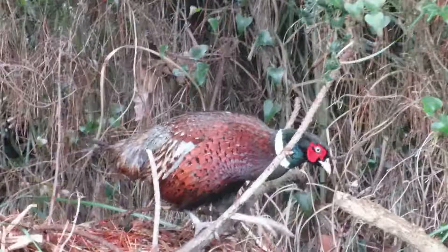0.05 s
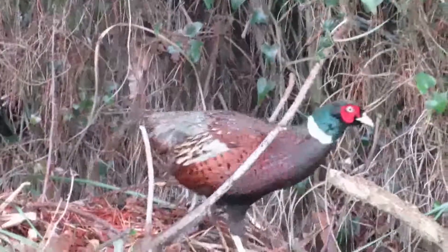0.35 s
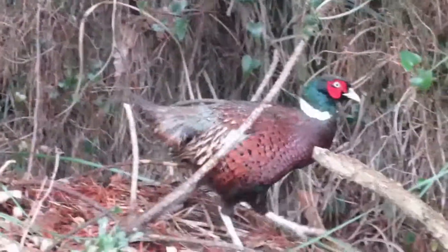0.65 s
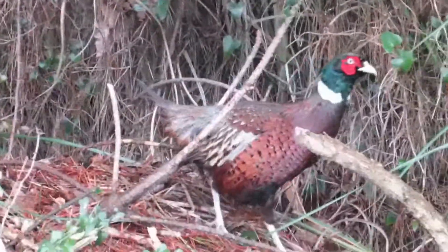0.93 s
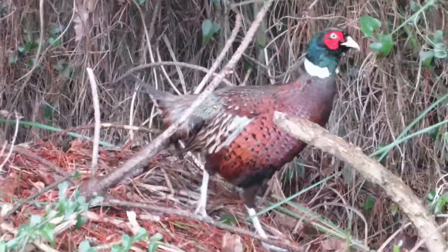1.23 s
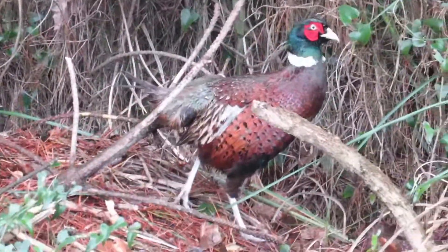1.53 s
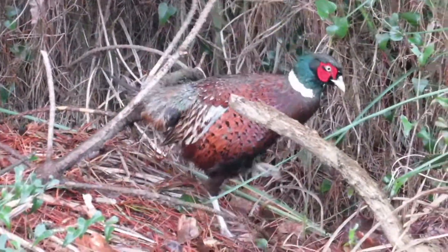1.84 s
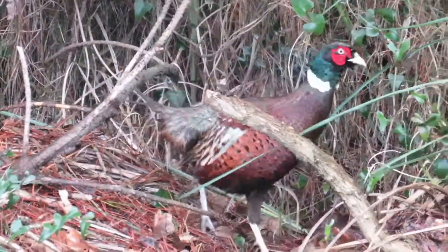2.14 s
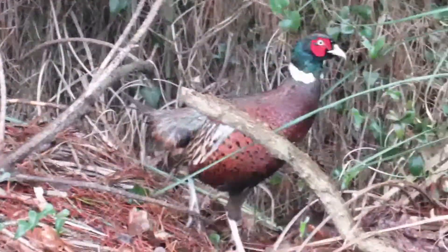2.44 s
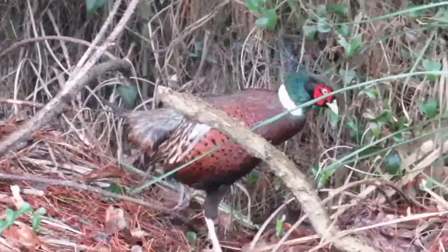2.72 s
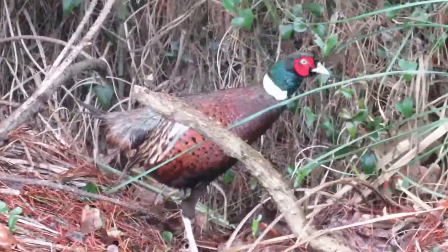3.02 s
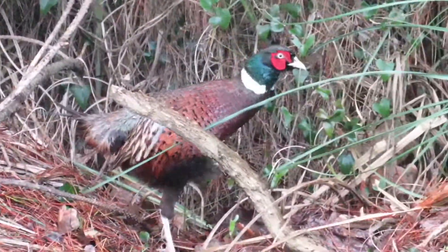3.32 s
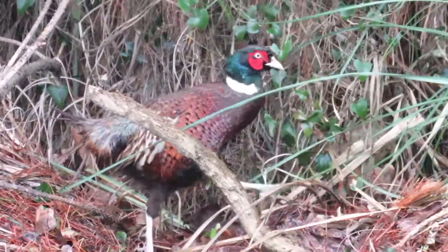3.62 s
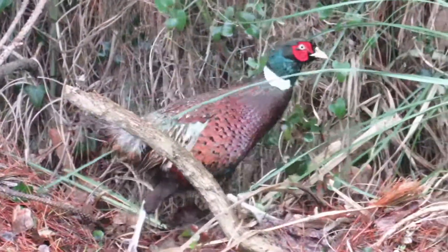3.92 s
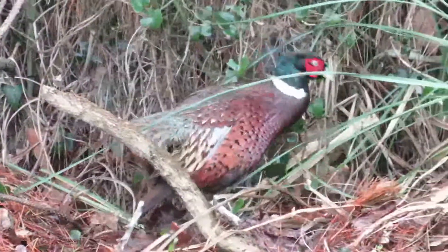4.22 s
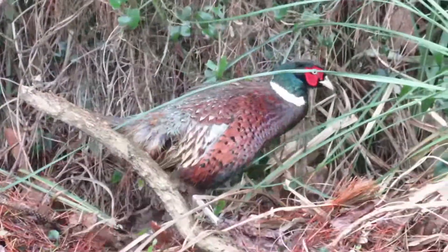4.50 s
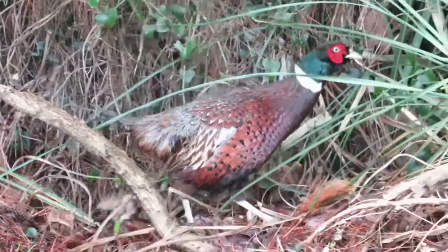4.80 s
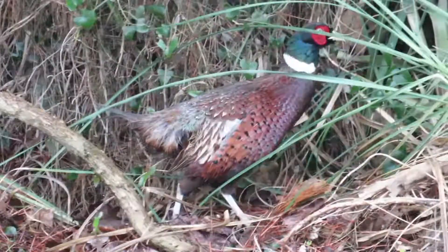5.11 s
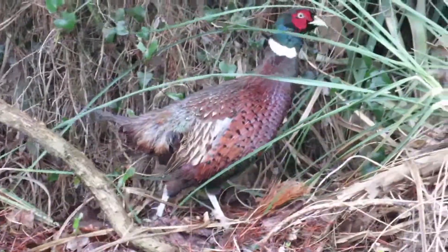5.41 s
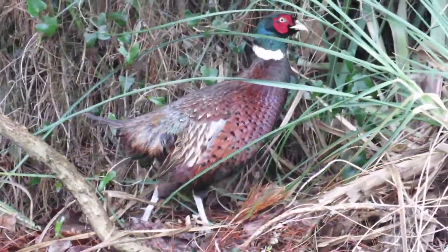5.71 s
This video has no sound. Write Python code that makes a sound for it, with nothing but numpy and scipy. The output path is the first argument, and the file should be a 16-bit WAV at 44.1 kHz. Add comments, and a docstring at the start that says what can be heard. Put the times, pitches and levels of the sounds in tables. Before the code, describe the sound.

A steady low rumble of distant traffic and wind runs for about six seconds, with a light hiss and faint ticks of dry leaves. A stick knocks once at 0.2 seconds. From 0.6 seconds gusts buffet the microphone with soft low thumps, the strongest at 1.3 seconds, returning more weakly around 2.1 and 2.9 seconds. Small birds off to the left give thin, high whistles and short chirps throughout, lightly scattered by the thicket, while a faint pip repeats about three times a second. Twigs crackle quietly under a walking pheasant around 1.9 and 2.1 seconds, and again near 4.8 and 5.2. Two quick chirps come at about 3.3 and 3.5 seconds, and a clearer falling, warbling note at 4.3. One dry click sounds just after 5 seconds, followed by a few last chirps.

```python
"""First comes a steady rumble of far traffic and wind over dry brush, and a stick knocks once.
Gusts then buffet the microphone, their swirls of air landing as soft thumps. Small birds whistle
and chirp in gliding tones that the thicket scatters, and a faint pip repeats. Twigs snap in
bursts of crackle under a walking pheasant, and one dry click sounds near the end."""
import sys
import numpy as np
from scipy import signal
from scipy.fft import rfft, irfft
from scipy.io import wavfile

SR = 44100
rng = np.random.default_rng(int(sys.argv[2]) if len(sys.argv) > 2 else 0)


def bounce(signal):
    """Save signal as a 16-bit WAV file at the path given by the first command-line argument."""
    frames = np.transpose(np.atleast_2d(signal))
    limited = np.clip(frames, -1, 1)
    pcm = np.round(limited * 32767).astype(np.int16)
    wavfile.write(sys.argv[1], SR, pcm)


N = 262395
T = np.arange(N) / SR

# how alike the left and right sides are: (frequency [Hz], likeness [1 = the same, 0 = unrelated])
STEREO_LIKENESS = [(60, 1), (200, 1), (500, 0.99), (1170, 0.92), (1790, 0.82), (2740, 0.23), (4200, 0.049),
                   (6400, 0.059), (14000, -0.26)]
# tone colour of dry plants cracking: (frequency [Hz], relative level [dB])
CRACK_SPECTRUM = [(1000, -9), (3500, 10), (7000, 1), (11000, -2.5), (15500, -14)]


def from_db(db):
    """Turn decibels into a number to multiply by."""
    return 10 ** (np.asarray(db) / 20)


def rms_one(x):
    """Scale a signal so its average strength (rms) is 1."""
    return x / np.sqrt(np.mean(x ** 2) + 1e-20)


def in_time(rows):
    """Join rows of (time, values...) with straight lines, one curve for each value."""
    times, *columns = np.transpose(rows)
    return [np.interp(T, times, column) for column in columns]


def at_hz(points, hz):
    """Read between rows of (frequency, value), giving every octave equal room."""
    frequencies, values = np.transpose(points)
    return np.interp(np.log(hz), np.log(frequencies), values)


def drift(rate_hz):
    """A smooth random wobble of typical size 1; a higher rate wobbles faster."""
    step, warm_up = 40, 2000  # one random value every 40 samples
    pole = np.exp(-2 * np.pi * rate_hz * step / SR)
    draws = rng.standard_normal(N // step + warm_up + 2)
    smooth = signal.lfilter([1], [1, -2 * pole, pole * pole], draws)[warm_up:]
    return np.interp(np.arange(N) / step, np.arange(len(smooth)), rms_one(smooth))


def noise(spectrum, likeness=STEREO_LIKENESS):
    """Stereo noise of strength 1 with a given tone colour, fading steeply outside its range."""
    hz = np.maximum(np.arange(N // 2 + 1) * SR / N, 1)
    edges = np.minimum(1, np.minimum(hz / spectrum[0][0], spectrum[-1][0] / hz)) ** 6
    mid, side = rfft(rng.standard_normal((2, N))) * from_db(at_hz(spectrum, hz)) * edges
    alike = np.clip(at_hz(likeness, hz), -.999, .999)
    return rms_one(irfft(np.sqrt(1 + alike) * mid + np.sqrt(1 - alike) * side * [[1], [-1]], N))


def tone(hz):
    """A pure tone of strength 1 that follows a pitch curve."""
    return np.sqrt(2) * np.sin(2 * np.pi * np.cumsum(hz) / SR)


def gate(start, end, edge_s):
    """Fade in at the start, hold, and fade out by the end."""
    return np.clip(np.minimum(T - start, end - T) / edge_s, 0, 1)


def swell(start, length_s, rise_share):
    """Rise smoothly for a share of the length, then fall smoothly."""
    crest = start + length_s * rise_share
    return np.sin(np.pi / 2 * np.interp(T, [start, crest, start + length_s], [0, 1, 0]))


def from_left(x, lag_s=.00004):
    """Sound from the left reaches the right side a little later."""
    return np.array([x, np.interp(T - lag_s, T, x)])


def air(rumble_gain_db, hiss_gain_db, waver_db):
    """Far traffic and wind waver slightly, with a growing engine drone below and a hiss above."""
    # tone colour of each layer: (frequency [Hz], relative level [dB])
    rumble_spectrum = [(22, -27), (64, -12), (104, -9.5), (170, -3.5), (230, -4), (350, -4), (450, -1),
                       (560, 1.57), (740, -6), (945, -8.5), (1150, -9.5), (2000, -20), (2800, -31)]
    drone_spectrum = [(120, -9), (175, -1), (235, -4.5)]
    hiss_spectrum = [(2200, -6), (2750, -3.5), (3100, -3.5), (4300, -5), (6560, -11), (10000, -17),
                     (13000, -22), (15000, -32)]
    # loudness before the gains are added: (time [s], rumble [dB], hiss [dB])
    air_levels = [(0.3, -38, -75), (0.56, -39.5, -75), (1.26, -39, -78), (2.9, -39, -78.5),
                  (3.6, -38.5, -78.5), (4.5, -39.5, -78), (5.66, -39.5, -78.5), (5.8, -41, -77.5)]
    # loudness of the far engines: (time [s], level [dB])
    drone_levels = [(.3, -69), (2.5, -56), (4.2, -50), (5.8, -50)]
    rumble_db, hiss_db = in_time(air_levels)
    rumble = from_db(rumble_db + rumble_gain_db + waver_db * drift(8.7)) * noise(rumble_spectrum)
    drone = from_db(in_time(drone_levels)[0]) * noise(drone_spectrum)
    hiss = from_db(hiss_db + hiss_gain_db) * noise(hiss_spectrum)
    return rumble + drone + hiss


def settling_leaves(level_db, ticks_per_s, decay_s):
    """Dry leaves and needles tick faintly as they settle."""
    ticks = (rng.random(N) < ticks_per_s / SR) * rng.uniform(0.43, 1, N)
    fading = signal.lfilter([1], [1, -np.exp(-1 / (decay_s * SR))], ticks + 1e-18)
    return from_db(level_db) * fading * noise(CRACK_SPECTRUM)


def hidden_birds(level_db, low_hz, high_hz, length_s, count):
    """Birds deep in the brush sing short, faint glides at random times."""
    pitch, level = np.full(N, float(low_hz)), np.zeros(N)
    for when, height, slope, softness in rng.random((count, 4)):
        progress = (T - when * T[-1]) / length_s
        on = (progress > 0) & (progress < 1)
        glide_octaves = (slope - .5) * progress[on] * .5
        pitch[on] = low_hz * (high_hz / low_hz) ** height * 2 ** glide_octaves
        level[on] = from_db(level_db - 6 * softness) * np.sin(np.pi * progress[on])
    return level * tone(pitch)


def pips(gain_db, upper_hz, upper_db, tail_db):
    """Tiny bursts of tone with a weak tail, each followed at once by a faint higher note."""
    # the pips, mostly three a second: (time [s], relative level [dB])
    pip_events = [(.188, -48), (.298, -57), (.403, -53), (.52, -50.5), (.795, -56), (.867, -47),
                  (.977, -49.5), (1.192, -51.5), (1.535, -50.5), (1.867, -50.5), (2.202, -50.5),
                  (2.538, -52.5), (2.87, -52.5), (3.206, -55), (3.538, -50.5), (3.874, -51.5),
                  (4.209, -50.5), (4.547, -52.5), (4.882, -48), (5.207, -51.5), (5.563, -49.5),
                  (5.79, -51.5), (5.875, -51.5)]
    width_s, tail_s, upper_delay_s = .0033, .012, .0035
    pitch_hz, rise_hz_per_s = 3075, 6.6
    level, waver = np.zeros(N), drift(169)
    for time, db in pip_events:
        near = np.abs(T - time) < .05
        age = T[near] - time
        burst = np.exp(-(age / width_s) ** 2)
        tail = (age > 0) * from_db(tail_db) * np.exp(-np.abs(age) / tail_s)
        level[near] += from_db(db + gain_db) * np.maximum(burst, tail)
    upper = from_db(upper_db) * np.interp(T - upper_delay_s, T, level) * tone(upper_hz + 200 * waver)
    return level * tone(pitch_hz + rise_hz_per_s * T + 50 * waver) + upper


def twig_snaps(grain_db):
    """Twigs break underfoot in fading bursts of crackle; the thinner the twig, the higher it sounds."""
    # breaking twigs: (time [s], relative level [dB], time to fade by 60 dB [s], low cut [Hz])
    snaps = [(1.852, -52.5, .16, 1200), (2.122, -58, .12, 1500), (4.798, -51.5, 0.36, 8500),
             (5.228, -52, .045, 7000)]
    crackle = rms_one(from_db(grain_db * drift(400))) * noise(CRACK_SPECTRUM)
    out = np.zeros((2, N))
    for start, db, fade_s, low_hz in snaps:
        level = (T >= start) * from_db(db - 60 * np.clip((T - start) / fade_s, 0, 3))
        out += level * signal.sosfilt(signal.butter(2, low_hz, "high", fs=SR, output="sos"), crackle)
    return out


def stick_knock(high_cut_hz):
    """One soft knock makes a stick ring briefly at several pitches."""
    # the knock: (time [s], strength of the hit [dB])
    knocks = [(0.2198, -28.5)]
    # how the wood rings: (pitch [Hz], relative level [dB], time to fade by 60 dB [s])
    wood_tones = [(1185, 2, 0.028), (1560, 1, 0.015), (1790, 1, 0.032), (1930, 0.5, .015),
                  (3800, -8.5, 0.016), (4830, -18, 0.015)]
    hits, out = np.zeros(N), np.zeros(N)
    for time, db in knocks:
        hits[round(time * SR)] = from_db(db)
    for k, (hz, db, fade_s) in enumerate(wood_tones):
        decay, angle = from_db(-60 / (fade_s * SR)), 2 * np.pi * hz / SR  # both per sample
        ring = signal.lfilter([0, np.sin(angle)], [1, -2 * decay * np.cos(angle), decay ** 2],
                              hits + 1e-18)
        out += (-1) ** k * from_db(db) * ring
    return signal.sosfilt(signal.butter(3, high_cut_hz, fs=SR, output="sos"), out)


def dry_click(time_s, peak_db, decay_s):
    """The air pressure jumps and falls back at once."""
    return (T >= time_s) * from_db(peak_db) * np.exp(-np.abs(T - time_s) / decay_s)


def thicket(x, gain_db, fade_s, build_s):
    """Countless stems scatter sound into a soft tail, different on each side."""
    age = T[:SR]
    tail = rng.standard_normal((2, SR)) * from_db(-60 * age / fade_s) * np.minimum(age / build_s, 1)
    tail = tail / np.sqrt(np.sum(tail ** 2) / 2)
    return from_db(gain_db) * signal.fftconvolve(x[None], tail, axes=1)[:, :N]


def whistles(gain_db, flutter_db, upper_db, unsteady_hz):
    """A far bird's thin, arching notes flutter through the leaves, with a faint second voice above."""
    # the notes: (time [s], length [s], pitch [Hz], relative level [dB], pitch swing [Hz],
    # time of the arch's top [s], arch rate [Hz], second voice [Hz], quiver depth [0-1])
    notes = [(.0, .11, 5660, -58, 80, .07, 8, 6500, .1),
             (1.059, .131, 5790, -51.3, 95, 1.135, 12.5, 6750, .1),
             (1.755, .07, 6790, -66, 70, 1.80, 8, 7400, .1),
             (1.885, .118, 5480, -61, 125, 1.951, 8, 6200, .15),
             (2.445, .155, 5790, -61.5, 35, 2.54, 7, 7150, .35),
             (2.992, .145, 5495, -56.7, 90, 3.062, 6.5, 6080, .05),
             (3.587, .138, 5750, -56.2, 55, 3.662, 8.5, 6750, .12),
             (5.014, .135, 5740, -58.8, 35, 5.05, 6, 6550, .4),
             (5.51, .22, 5500, -66.5, 45, 5.62, 4.5, 6200, .4)]
    droop_hz, droop_s = 60.5, 0.0259  # each note sags as it ends
    quivers_per_s, quiver_hz = 31, 50  # a quiver shakes loudness and pitch together
    pitch, upper_pitch, level = np.zeros((3, N))
    for start, length, hz, db, swing_hz, crest, arches_per_s, upper_hz, quiver_depth in notes:
        arch = swing_hz * np.cos(2 * np.pi * arches_per_s * (T - crest))
        droop = droop_hz * np.clip(1 + (T - start - length) / droop_s, 0, 1)
        quiver = quiver_depth * np.cos(2 * np.pi * quivers_per_s * (T - start))
        bend = arch - droop + quiver_hz * quiver
        pitch = np.where(T >= start, hz + bend, pitch)
        upper_pitch = np.where(T >= start, upper_hz + bend, upper_pitch)
        level += from_db(db + gain_db) * gate(start, start + length, edge_s=0.016) * (1 + quiver)
    voice = tone(pitch + unsteady_hz * drift(120))
    upper_voice = from_db(upper_db) * tone(upper_pitch + 70 * drift(60))
    return level * from_db(flutter_db * drift(45)) * (voice + upper_voice)


def chirps():
    """Nearer birds sing raspy glides. Returns the direct sound and the part that enters the thicket."""
    # the chirps: (time [s], length [s], first pitch [Hz], target pitch [Hz], glide time [s], level [dB],
    # rasp [Hz], second voice strength [0-1], share spent rising [0-1], part sent to the thicket [dB])
    calls = [(.272, .045, 3700, 2900, .03, -63, 60, 0, .5, -10),
             (.945, .05, 4000, 3200, .03, -64, 60, 0, .4, -10),
             (1.945, .065, 4300, 3300, .05, -67, 40, 0, .3, -6),
             (2.365, .065, 3800, 6000, .075, -61, 130, 0, .3, -6),
             (3.2893, .011, 4200, 7150, .0019, -48.3, 220, .45, .22, -3.5),
             (3.4787, .017, 4200, 7130, .0018, -49.2, 130, .42, .14, -5),
             (4.868, .022, 7250, 7400, .006, -62, 30, 0, .3, -6),
             (5.243, .075, 2620, 2935, .013, -52, 20, 0, .42, -10.5),
             (5.783, .025, 5250, 5450, .01, -63, 110, .4, .4, -10),
             (5.802, .008, 2400, 3700, .004, -56, 60, 0, .4, -10),
             (5.811, .036, 5750, 6650, .016, -51, 90, 0, .45, -14)]
    second_pitch_ratio, second_rasp_hz, rasps_per_s = 1.18, 340, 450
    direct, to_thicket = np.zeros(N), np.zeros(N)
    rasp, second_rasp = drift(rasps_per_s), second_rasp_hz * drift(rasps_per_s)
    for start, length, first_hz, target_hz, glide_s, db, rasp_hz, second, rise_share, send_db in calls:
        glide_left = np.exp(-np.clip(T - start, 0, length) / glide_s)
        hz = target_hz + (first_hz - target_hz) * glide_left + rasp_hz * rasp
        voices = tone(hz) + second * tone(hz * second_pitch_ratio + second_rasp)
        chirp = from_db(db) * swell(start, length, rise_share) * voices
        direct += chirp
        to_thicket += from_db(send_db) * chirp
    return direct, to_thicket


def falling_call(start_s, warbles_per_s, rise_share):
    """The two sides of a bird's voice box slide down, warbling together and beating against each other."""
    # the two voices: (length [s], first pitch [Hz], last pitch [Hz], warble depth [Hz], level [dB])
    voices = [(0.058, 5980, 5160, 160, -44), (.075, 6270, 6030, 40, -48)]
    warble = -np.cos(2 * np.pi * warbles_per_s * (T - start_s))
    out = np.zeros(N)
    for length, first_hz, last_hz, depth_hz, db in voices:
        hz = np.interp(T, [start_s, start_s + length], [first_hz, last_hz]) + depth_hz * warble
        out += from_db(db) * swell(start_s, length, rise_share) ** 2 * tone(hz)
    return out


def birds():
    """Birds off to the left, with one short echo and the scattered sound of the thicket."""
    deep = hidden_birds(level_db=-71, low_hz=3400, high_hz=7400, length_s=.035, count=18)
    far = whistles(gain_db=-0.2, flutter_db=2.0, upper_db=-18, unsteady_hz=20) + deep
    near, to_thicket = chirps()
    nearest = falling_call(start_s=4.323, warbles_per_s=42, rise_share=0.47)
    echo = from_db(-18.5) * np.interp(T - 0.091, T, far + nearest)  # 91 ms late
    far_tail = thicket(far, gain_db=-7.5, fade_s=0.53, build_s=0.031)
    near_tail = thicket(to_thicket + from_db(-18) * nearest, gain_db=1.5, fade_s=0.43, build_s=0.0031)
    return from_left(far + echo + near + nearest) + far_tail + near_tail


def swirl(age, hz, focus):
    """A swirl of air: a pressure dip between two humps. More focus gives it a clearer pitch."""
    return -np.real((1 - 2j * np.pi * hz * age / focus) ** -(focus + 1))


def wind_on_microphone(lumpy_db, likeness, crossing_s, low_cut_hz):
    """Gusts of rough air rise, hold and die away; single swirls thump, the strong ones more sharply."""
    # tone colour of the buffeting: (frequency [Hz], relative level [dB])
    buffet_spectrum = [(25, -22), (45, 1), (75, 1.5), (120, 3), (180, -4), (260, -8.5), (400, -9),
                       (700, -31)]
    # the gusts: (time [s], length [s], level [dB])
    gusts = [(0.614, 0.39, -39), (0.74, 0.067, -34), (0.898, 0.32, -35), (1.282, 0.07, -34),
             (1.452, 0.16, -39.5), (2.056, 0.17, -41.5), (2.67, 0.12, -40.5), (2.85, 0.13, -37.5),
             (4.623, 0.55, -49.5)]
    # swirls hitting the microphone: (time [s], strength [dB], pitch [Hz], left over right [dB])
    swirls = [(0.674, -28, 124, -3), (0.793, -23.5, 155, -10), (0.95, -28, 170, -7),
              (0.983, -18.5, 154, -5), (1.024, -18, 198, -5), (1.038, -21, 149, 0), (1.089, -21, 136, 5),
              (1.126, -19.5, 175, -7), (1.21, -18, 165, -2.5), (1.32, -20.5, 150, -9),
              (1.3369, -4.5, 147, -3), (1.574, -19.5, 118, -3), (1.651, -19.5, 123, -1),
              (2.09, -27.5, 148, -2), (2.13, -24, 165, -3), (2.21, -27, 170, -1), (2.896, -26, 128, -8),
              (2.97, -27.5, 130, 0)]
    breeze_db, breeze_db_per_s = -65.5, 2  # a light breeze slowly grows between gusts
    rise_s, fall_s = 0.01, 0.045
    core_db, core_pitch_ratio = -4.5, 2.74  # a swirl's sharp centre
    level = from_db(breeze_db + breeze_db_per_s * T)
    for start, length, db in gusts:
        rise = np.clip((T - start) / rise_s, 0, 1)
        fall = np.exp(-np.maximum(T - start - length, 0) / fall_s)
        level = np.maximum(level, from_db(db) * rise * fall)
    out = level * from_db(lumpy_db * drift(40)) * noise(buffet_spectrum, [(40, 1.0), (250, likeness)])
    sides = np.array([[.5], [-.5]])
    for time, db, hz, pan_db in swirls:
        near = np.abs(T - time) < .04
        age = T[near] - time + crossing_s * sides  # the swirl reaches the left side first
        thump = from_db(db + pan_db * sides) * swirl(age, hz, focus=7.5)
        # doubling the decibels makes the core grow with the square of the strength
        core = from_db(2 * db + core_db) * swirl(age, hz * core_pitch_ratio, focus=22)
        out[:, near] += thump + core
    return signal.sosfiltfilt(signal.butter(1, low_cut_hz, "high", fs=SR, output="sos"), out)


def scene():
    """Air and wind all round, birds and pips to the left, and small dry sounds in the brush."""
    birdsong = birds()
    brush = (twig_snaps(grain_db=2.5)
             + settling_leaves(level_db=-54.5, ticks_per_s=5, decay_s=0.0018)
             + stick_knock(high_cut_hz=4960)
             + dry_click(time_s=5.1446, peak_db=-26.3, decay_s=.00011))
    pipping = from_left(pips(gain_db=-2.5, upper_hz=4840, upper_db=-10.5, tail_db=-9.5))
    background = air(rumble_gain_db=0.75, hiss_gain_db=16.0, waver_db=1.0)
    wind = wind_on_microphone(lumpy_db=1.5, likeness=0.73, crossing_s=.0008, low_cut_hz=48.5)
    return background + pipping + brush + birdsong + wind


def record(dry):
    """The sound starts after a short silence, and the highest treble is cut away."""
    silence_s, high_cut_hz = .072, 15500
    treble_cut = signal.ellip(10, .2, 80, high_cut_hz, fs=SR, output="sos")
    return signal.sosfilt(treble_cut, dry * (T >= silence_s))


dry = scene()
out = record(dry)
bounce(out)
```